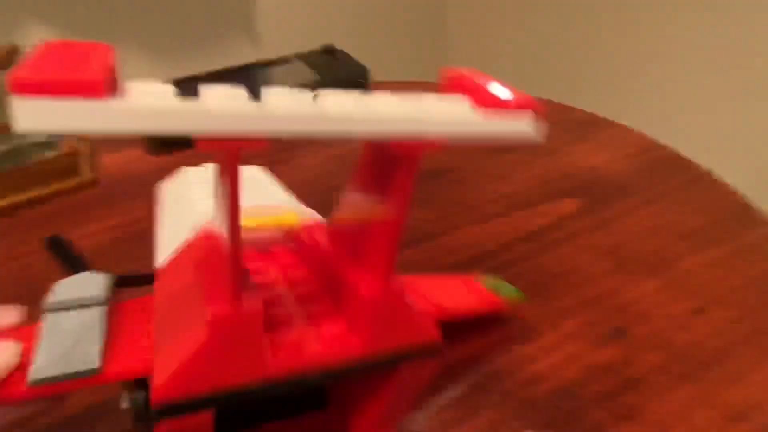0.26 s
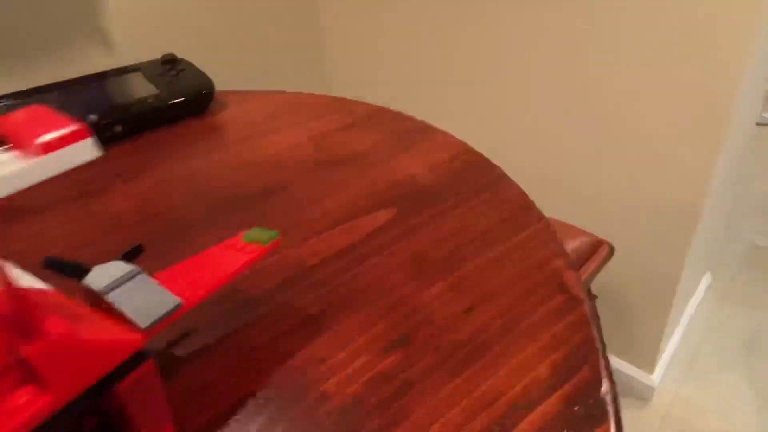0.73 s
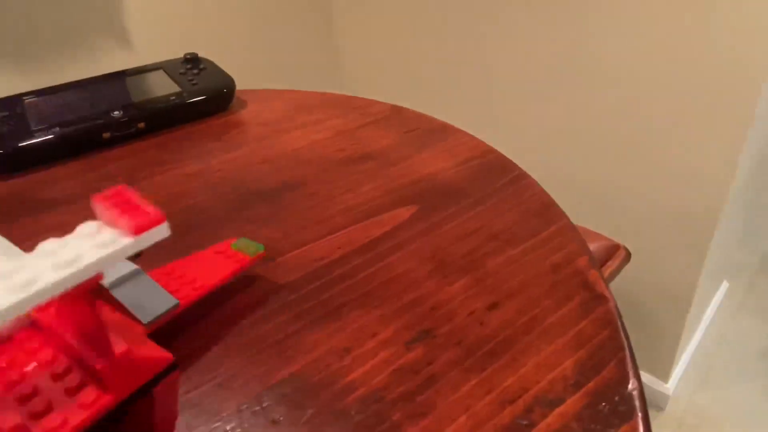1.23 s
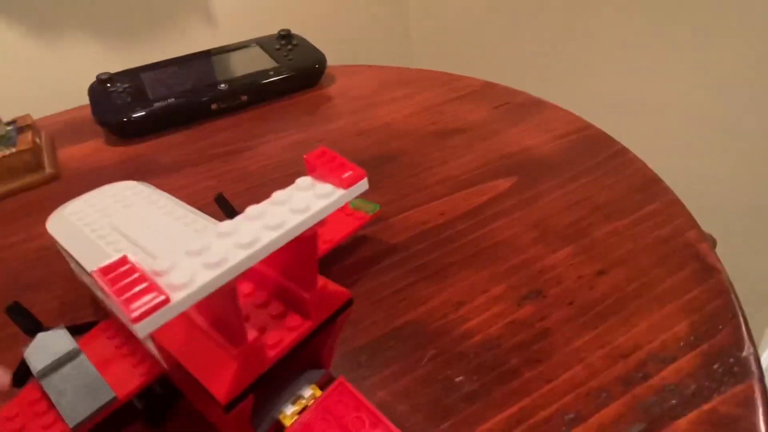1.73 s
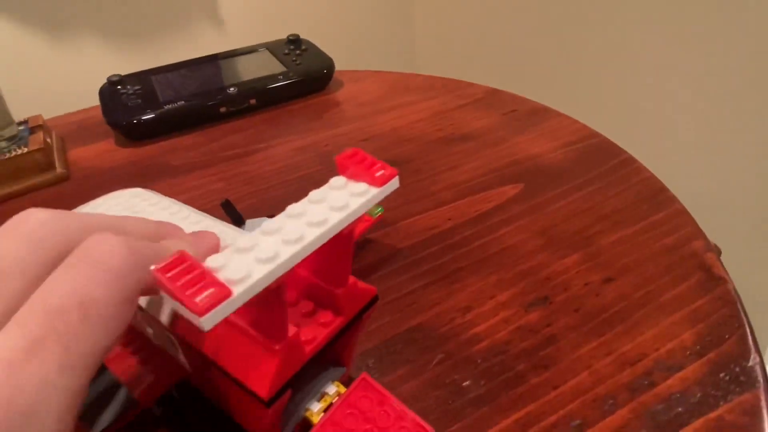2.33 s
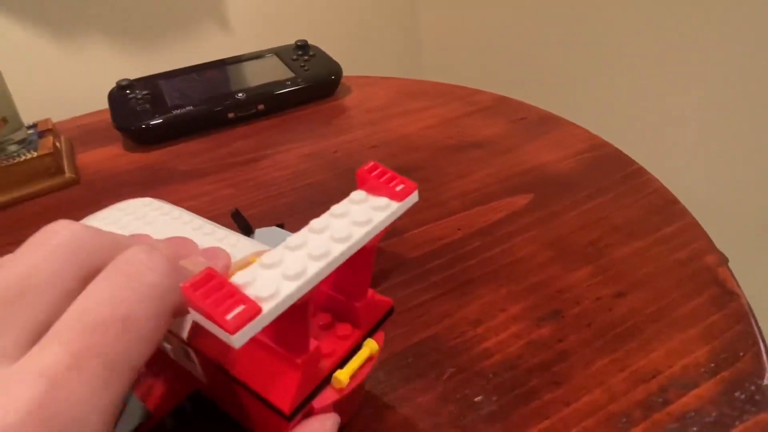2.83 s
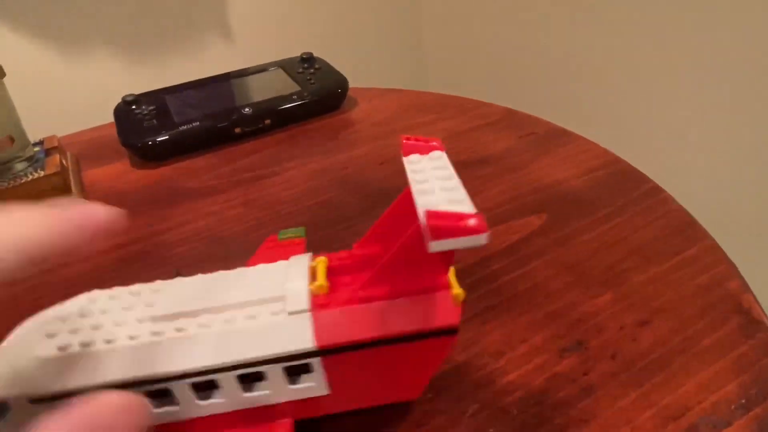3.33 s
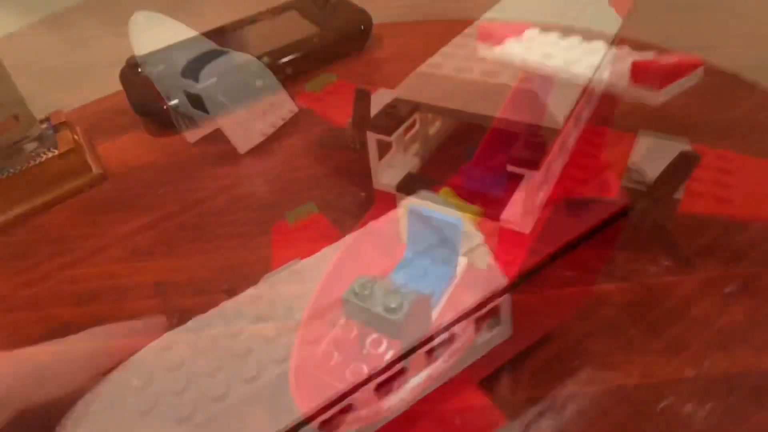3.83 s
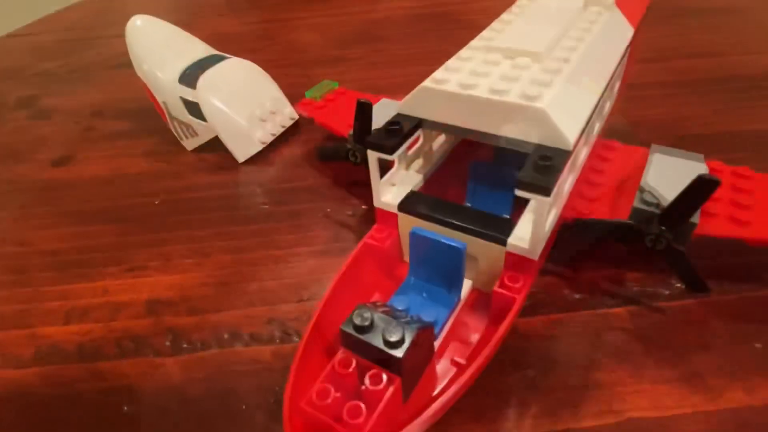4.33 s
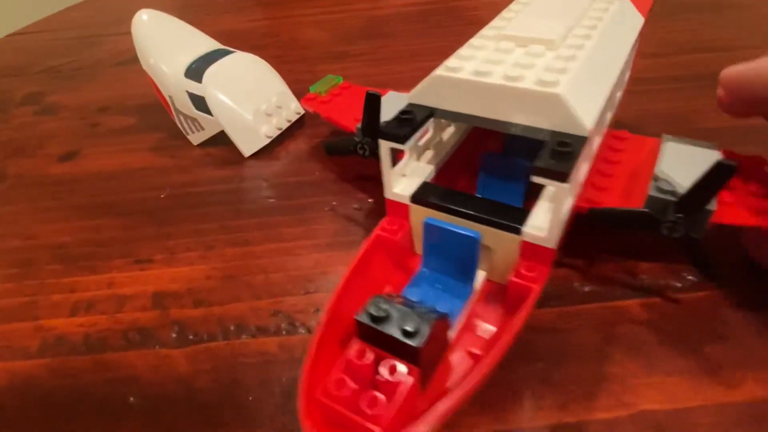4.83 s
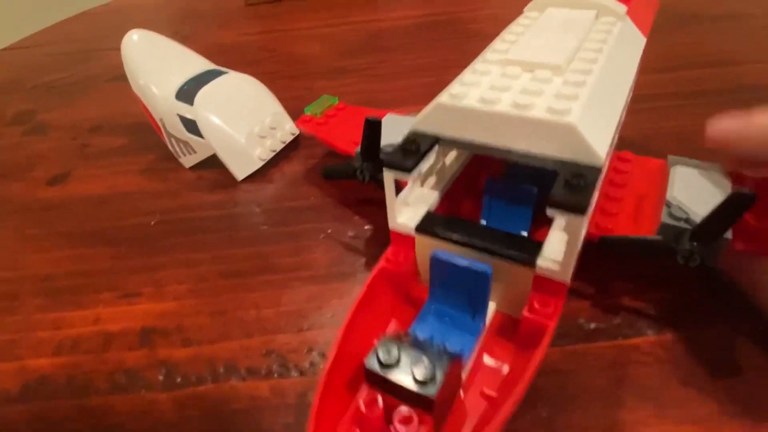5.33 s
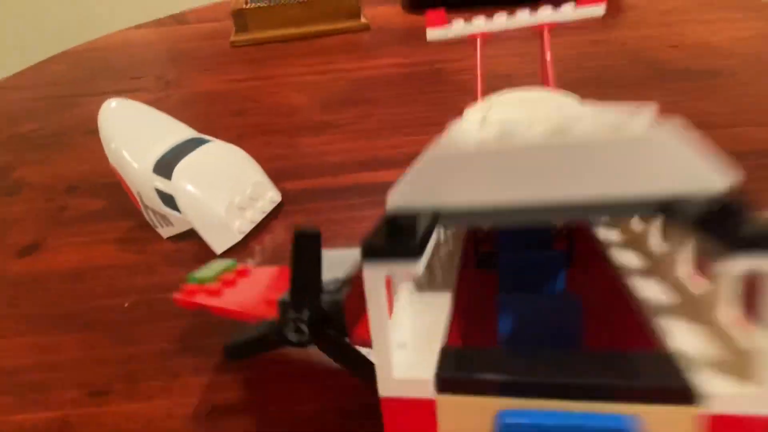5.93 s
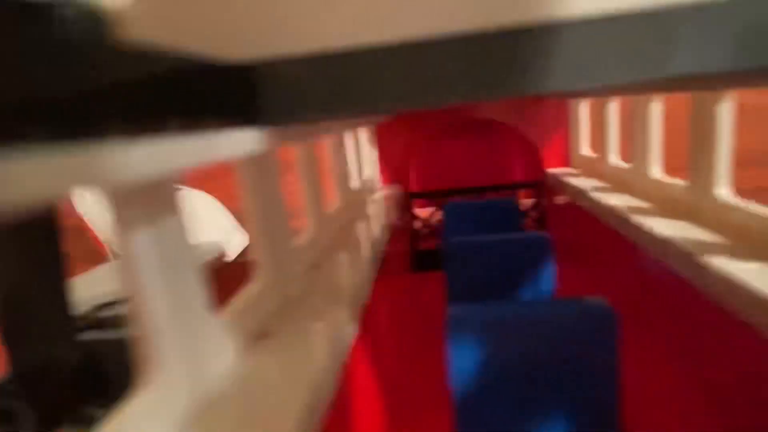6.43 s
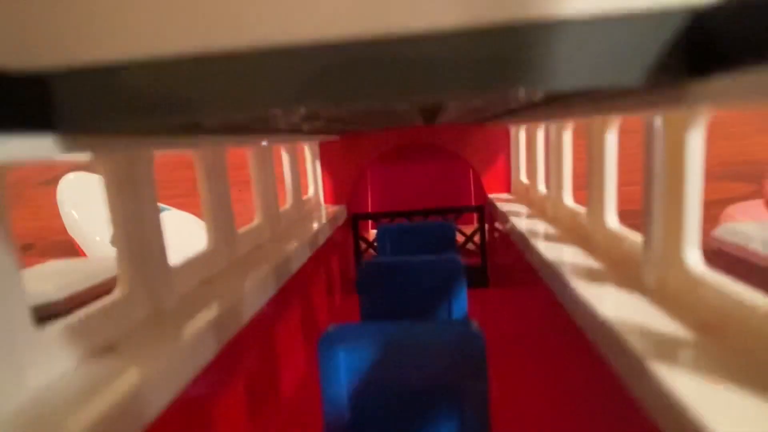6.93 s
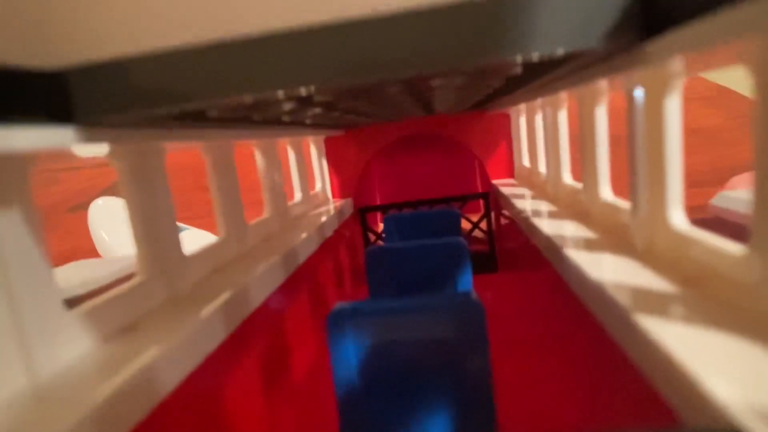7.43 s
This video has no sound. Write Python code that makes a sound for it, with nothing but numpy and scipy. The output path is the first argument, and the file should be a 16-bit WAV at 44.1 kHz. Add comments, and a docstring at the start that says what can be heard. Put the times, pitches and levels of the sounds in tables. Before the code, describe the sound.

Sharp plastic clacks and dull table thumps, soft rubbing slides and small ticks as a toy brick aeroplane is handled in a quiet room.

```python
"""Toy bricks handled on a table

A model of hollow plastic bricks is set down, turned, slid and lifted on a wooden table near two small microphones.
Tiny impacts click and rattle the thin walls, the hollow body rings briefly, and knocks make the table top thump.
Slides are streams of fine slips, one with a faint whistle; shaped noise makes the hum of a quiet room.
After a pause the model lies on the other side of the microphones.
"""
import sys
import numpy as np
from scipy import signal
from scipy.fft import rfft, irfft, next_fast_len
from scipy.io import wavfile
from scipy.ndimage import uniform_filter1d

SR = 44100
rng = np.random.default_rng(int(sys.argv[2]) if len(sys.argv) > 2 else 0)


def bounce(signal):
    """Save signal as a 16-bit WAV file at the path given by the first command-line argument."""
    frames = np.transpose(np.atleast_2d(signal))
    limited = np.clip(frames, -1, 1)
    pcm = np.round(limited * 32767).astype(np.int16)
    wavfile.write(sys.argv[1], SR, pcm)


N = 338247

# The room's noise spectrum: pitch_hz, level_db (relative)
ROOM_COLOUR = [(15, -51.5), (43, -6), (85, -8), (220, -3.5), (245, -11.5), (304, -7.5), (483, -9),
               (700, -13.5), (1090, -15.5), (2000, -29.5), (4000, -50), (7000, -51.5), (8400, -46),
               (11000, -63.5), (14000, -76), (16500, -87.5)]
# Fuzzy low hums on top of the room noise: pitch_hz, width_hz, lift_db
HUMS = [(64.6, 44, 3.5), (157, 26, 7), (201, 19, 7), (309, 55, 6), (438.2, 11, 16.5)]
# How alike the room is at left and right: pitch_hz, likeness (1 = the same)
ROOM_LIKENESS = [(60, 0.94), (240, 0.71), (950, -0.5), (3770, 0.64), (15000, 0.83)]
ROOM_DB = -53.5

# Ringing tones (modes) of the table top: pitch_hz, level_db (relative), t60_s (60 dB fall after a knock)
TABLE_MODES = [(65.4, 3.5, 0.22), (124, 0, 0.076), (138.6, 8.5, 0.11), (169.3, 1.5, 0.058),
               (210.9, 7.5, 0.088), (263.7, -1.5, 0.22), (290.9, 2, 0.17), (346, -8.5, 0.099),
               (385.3, -8, 0.099), (482, -9.5, 0.054), (602, -14, 0.04), (750, -18, 0.079)]
# The table murmuring under the moving model: time_s, level_db
RUMBLE_LEVEL = [(0, -55.5), (.32, -41), (.47, -47.5), (.56, -51.5), (1.07, -54.5), (1.28, -48), (1.64, -60),
                (2.2, -53), (2.95, -56), (3.15, -45), (3.449, -49.5), (3.89, -66), (5.48, -60),
                (5.539, -41), (5.72, -45), (6.0, -67.5), (6.41, -59.5), (7.05, -62), (7.67, -64.5)]
# Above LOAD_DB the weight favours lower table modes
RUMBLE_HZ, LOAD_DB, SINK_HZ_PER_DB = 199, -57.5, 6.5
# Knocks on the table: start_s, level_db, centre_hz (middle of the modes the blow drives)
KNOCKS = [(0.132, -18.5, 267), (0.191, -23, 286), (0.242, -20, 145), (0.278, -35, 145), (0.47, -34, 255),
          (1.067, -33, 159), (1.105, -12.5, 170), (1.142, -19.5, 202), (1.155, -20, 122),
          (1.197, -22, 283.6), (1.224, -27.5, 70.1), (2.435, -34, 137.2), (2.806, -44, 440),
          (3.428, -37.5, 139), (5.492, -21.5, 324), (5.515, -28.5, 133), (5.578, -32.5, 467),
          (5.639, -30, 126), (5.717, -36.5, 143.7), (6.042, -22.5, 382), (6.051, -26.5, 80.5),
          (6.09, -31.5, 164.5), (6.325, -36.5, 150.6), (6.335, -33, 65.2), (6.899, -23.5, 137),
          (6.923, -26.5, 148)]
# Lift of the upper table modes before and after the move: lift_db
HARD_LIFT = (6.5, 13.5)
# Left-right balance of the knocks before and after the move: left_minus_right_db
KNOCK_BALANCE = (5, -0.5)
# Random phase of each table mode, and half its left-right phase difference, in radians
THUMP_SCATTER_RAD, THUMP_SPREAD_RAD = 0.45, 0.18

# Modes of the thin brick walls: pitch_hz, width_hz, level_db (relative)
WALL_MODES = [(3590, 80, -8), (6500, 70, -4.5), (4000, 64, -9.5), (4970, 120, -3.5), (5230, 25, -14.5),
              (5800, 32, -5.5), (7100, 150, 3.5), (7480, 700, -24.5), (9000, 52, -33), (10000, 130, -6),
              (11300, 85, -9.5), (12800, 56, -16)]
# Colour of knocked brick walls: pitch_hz, level_db (relative)
WALL_COLOUR = [(880, -32.5), (1500, -4.5), (2150, -3.5), (3030, -2), (4520, -8.5), (5640, -6.5),
               (6620, -12), (7850, -15), (11500, -19), (15900, -28.5), (16500, -42.5)]
# Modes of the hollow body: pitch_hz, width_hz, level_db (relative)
BODY_MODES = [(960, 230, -3), (1278, 73, 1), (1554, 62, -0.5), (2150, 100, -7.5), (2670, 180, -5)]
# Colour of sliding bricks: pitch_hz, level_db (relative)
SLIDE_COLOUR = [(1000, -35.5), (1700, -10.5), (1910, -13.5), (2510, -10), (3150, -6.5), (3540, -4.5),
                (4120, -7), (4610, -7.5), (6080, -12), (6560, -10.5), (7570, -18), (12200, -20),
                (12600, -22.5), (13500, -55), (16500, -64.5)]
# A faint thin whistle in a slide: start_s, rise_s, hold_s, fall_s, level_db, pitch_hz, width_hz
WHISTLES = [(0.513, 0.11, 0.1, 0.06, -67, 5670, 69.4)]
# Slides and rubs: start_s, rise_s, hold_s, fall_s, hiss_db, wall_hz, body_db, body_hz
RUBS = [(0.275, 0.0028, 0.057, 0.34, -50.5, 2360, -39, 820),
        (0.201, 0.041, 0.263, 0.03, -58, 2500, -67, 1000), (0.448, 0.08, .2, 0.085, -69.5, 4480, -59, 1117),
        (0.776, 0.013, 0.043, 0.016, -61.5, 5850, -51, 1024),
        (1.03, 0.025, .05, 0.024, -50, 6420, -41, 1660), (1.295, 0.13, .01, 0.078, -69, 4470, -58, 1088),
        (1.594, 0.12, 0.16, 0.59, -68, 3117, -69, 871), (2.206, 0.031, 0.19, .06, -62, 3520, -56.5, 1226),
        (2.386, 0.036, .01, 0.1, -65.5, 4620, -60, 1132),
        (2.539, 0.043, 0.0098, 0.33, -68.5, 4500, -56.5, 1423),
        (2.864, 0.11, 0.32, 0.056, -60, 4500, -52.5, 1373), (3.0, 0.15, 0.12, 0.21, -45, 4460, -45, 1413),
        (3.279, 0.068, 0.095, 0.14, -58.5, 3510, -53.5, 1364),
        (3.525, 0.042, 0.066, 0.098, -51, 4600, -43.5, 1332),
        (3.692, 0.037, .01, 0.4, -76, 4636, -69.5, 1243),
        (4.597, 0.22, 0.048, 0.087, -73, 6600, -65.5, 1614),
        (5.084, 0.021, 0.027, 0.027, -81, 6540, -77, 1820),
        (5.173, 0.036, 0.043, .03, -81, 6690, -74.5, 2630),
        (5.37, 0.014, 0.036, 0.11, -60.5, 3960, -64, 2680),
        (5.559, 0.028, 0.097, 0.071, -64.5, 4150, -52.5, 2127),
        (5.726, 0.024, 0.036, 0.06, -76.5, 3000, -59.5, 2090)]
# Loose bricks rattling after a knock: start_s, fall_s, hiss_db, body_db, body_hz
LOOSE_RATTLES = [(0.136, 0.1, -31.5, -31, 1290), (0.188, 0.1, -33.5, -38.5, 994),
                 (1.106, 0.26, -27.5, -38, 1680), (1.221, 0.056, -43, -26, 1644),
                 (2.812, 0.037, -70, -66, 1650), (5.491, 0.16, -29.5, -35, 2048),
                 (5.593, 0.029, -32, -35.5, 2820), (6.045, 0.12, -35.5, -33, 2450),
                 (6.33, 0.057, -72, -42.5, 1930), (6.48, 0.066, -64.5, -60.5, 2008),
                 (6.619, .05, -68.5, -71.5, 1226), (6.887, 0.1, -38.5, -33, 2040)]
# Clicks: start_s, crack_db, wall_hz, treble_lift_db (negative dulls), ring_db, ring_hz
BRICK_CLICKS = [(0.133, -8.5, 2290, 12, -15.5, 910), (0.1889, -18.5, 11240, 6, -15.5, 1040),
                (0.2178, -21.5, 4700, 2, -26, 1420), (0.2397, -24.5, 6500, 3.5, -8, 966),
                (0.277, -47, 2400, 21, -18, 900), (0.604, -42, 9900, 47, -63, 918),
                (0.813, -27, 4480, -5, -30, 916), (0.8216, -32, 4290, -12, -37, 990),
                (0.962, -57.5, 4900, -4.5, -64, 1200), (0.9153, -94, 2820, 0.5, -37, 1310),
                (1.057, -38, 6400, -1, -33, 1680), (1.1038, -2.5, 4310, 7, -12.5, 960),
                (1.106, -7, 7080, -6, -13, 1930), (1.1419, -11, 7200, 2.5, -17, 4240),
                (1.154, -22, 3990, 8.5, -12, 1130), (1.1641, -15, 4440, 3, -19.5, 1150),
                (1.1755, -23, 4600, 2.5, -29, 1900), (1.196, -21, 6500, 10, -26.5, 1050),
                (1.2084, -22.5, 4660, 8, -23.5, 1110), (1.2202, -26.5, 10510, 7, -23, 2500),
                (1.2217, -19.5, 2600, -5, -15, 1527), (1.233, -31, 2300, -10, -24, 1727),
                (1.344, -43, 4270, 19, -36, 1210), (1.3847, -37, 5000, 3, -36.5, 970),
                (1.4165, -34.5, 2758, 6.5, -42, 1190), (2.223, -59.5, 3535, -5, -37, 1423),
                (2.2994, -36.5, 2760, 3, -28, 1254), (2.3569, -46, 3370, 7, -49, 964),
                (2.4131, -37.5, 5500, 13, -33, 1040), (2.4189, -47, 6700, 17, -32, 1030),
                (2.43, -40, 4220, -1, -31.5, 1757), (2.577, -31.5, 5060, 13, -59, 1613),
                (2.804, -21, 4150, -1, -23, 1233), (2.8068, -18.5, 3245, -9.5, -21.5, 1682),
                (3.032, -39.5, 4280, 19.5, -43.5, 915), (3.355, -37, 3620, -11, -60, 1400),
                (3.1016, -44, 4200, 17, -33, 1530), (3.2535, -30, 4460, -16, -35, 1430),
                (3.272, -29, 4120, 10.5, -53, 1220), (3.5807, -32.5, 3830, -5, -49.5, 1300),
                (3.5998, -28, 4890, 11, -49, 1415), (3.778, -58.5, 4440, -5.5, -39, 1452),
                (3.807, -60.5, 2900, -1, -44.5, 1310), (3.833, -46, 2726, 4, -63, 1287),
                (3.9443, -55, 4590, 12, -60.5, 1193), (3.962, -57.5, 4500, 8.5, -64.5, 1204),
                (4.2296, -55, 8460, 23, -81, 693), (4.8074, -43.5, 6500, 6, -55.5, 1096),
                (5.216, -58, 4110, 16, -69.5, 2610), (5.3792, -45.5, 6430, -4, -70, 693),
                (5.388, -42.5, 8770, 11, -36, 2730), (5.414, -39.5, 6550, 2, -45, 3960),
                (5.492, -29, 6560, 18, -27.5, 2400), (5.5131, -13.5, 6620, 12, -22, 2400),
                (5.577, -52, 4320, -2, -45, 2070), (5.5918, -33, 6300, 17, -24, 3180),
                (5.6308, -40, 3940, 0, -44, 2000), (5.638, -42, 6600, 2, -42, 2190),
                (5.7153, -55, 6500, -14, -39, 2570), (5.74, -54.5, 6900, -0.5, -60.5, 2000),
                (5.773, -58.5, 4770, -10, -47, 2200), (5.823, -66.5, 6500, 0.5, -50.5, 2100),
                (6.0414, -23, 4170, 28, -29.5, 2480), (6.086, -33, 4170, 1, -26.5, 2310),
                (6.3256, -56, 3670, -1.5, -39, 2130), (6.34, -45.5, 2790, -33, -45.5, 1484),
                (6.48, -47.5, 6930, 16.5, -59, 2115), (6.5042, -47.5, 7250, 13.5, -54, 2020),
                (6.6387, -55.5, 6700, 19, -58, 1475), (6.8918, -30, 6280, 21.5, -35.5, 2223),
                (6.9017, -23, 2620, 15, -38, 2140), (6.9299, -27, 7360, 20, -29, 2135),
                (6.947, -49, 6940, -8, -62, 2060)]
ENDS_DB, SLIDE_CURVE = -37.5, 1.47  # level where a rise starts or a fall ends; power of the swell
RATTLE_RISE_S, RATTLE_CURVE, RATTLE_WALL_HZ = 0.002, 0.81, 4360
SLIDE_ROUGH, RATTLE_ROUGH = 0.8, 1.05  # how uneven the slips are
RING_WIDTH = 0.1  # width of the hollow ring as a share of its pitch

MOVED_S = 4.4  # the model is on the other side from here on
# Two lists, before and after the move: pitch_hz, left_lead_rad
LEFT_LEAD = ([(0, 0), (1890, 2.8), (2670, 1.9), (7060, 13.1), (8700, 22.4), (9820, 19.9), (14400, 14.9),
              (15200, 12.6), (16400, 13.0)], [(0, 0), (3010, -8.8), (4310, -6.4), (7410, -15.6),
              (9300, -12.3), (9820, -13.1), (16400, -12.3)])
# Two lists, before and after the move: pitch_hz, left_minus_right_db
PORT_BALANCE = ([(60, 0), (150, 0), (380, -3.5), (950, 7.5), (2380, -6), (5980, 0.5), (15000, -3.5)],
                 [(60, -8), (150, -4.5), (380, -5), (950, -9), (2380, 4), (5980, -5), (15000, -1)])
# Balance of the brick sounds as the place changes: time_s, left_minus_right_db
PLACE_BALANCE = [(0, 1), (4.4, -0.5), (5.5, -1), (6.1, -8.5), (6.9, -9)]
# Share of the left-right wander and balance in each band: pitch_hz, share
STEREO_SHARE = [(300, 0.23), (2000, 0.91), (8500, 1), (10500, 0.049)]
SPREAD_RAD = 0.82  # typical phase wander at each port where the share is 1
EDGE_HZ = 16500  # upper band limit


def amp(db):
    """Turn decibels into a gain."""
    return 10 ** (np.asarray(db) / 20)


def evened(x):
    """Scale to an average (RMS) level of 1."""
    return x / np.sqrt(np.mean(x ** 2) + 1e-20)


def peaked(x):
    """Scale to a tallest peak of 1."""
    return x / (abs(x).max() + 1e-20)


def read(points, hz):
    """Read a curve between its points, on a logarithmic pitch scale."""
    f, value = np.transpose(points)
    return np.interp(np.log(hz + 1), np.log(f + 1), value)


def add(mix, s, sound):
    """Add a sound to the mix at s seconds, cutting what runs past the end."""
    part = mix[:, round(s * SR):][:, :sound.shape[1]]
    part += sound[:, :part.shape[1]]


def patchwork(shape, bins, frames):
    """Smooth random patches over pitch and time."""
    smooth = uniform_filter1d(rng.standard_normal(shape), bins, 0)
    return evened(uniform_filter1d(smooth, frames, 1))


def resonate(x, hz, width):
    """One complex pole: a resonance of gain 1 that rings longer when narrower."""
    r = np.exp(-np.pi * abs(width) / SR)
    return 2 * signal.lfilter([1 - r], [1, -r * np.exp(2j * np.pi * hz / SR)], x + 1e-18).real


def through(modes, x, spread_db):
    """Sum of the modes; each point of contact drives them in other shares."""
    shares = amp(spread_db * rng.standard_normal(len(modes))) * rng.choice([-1, 1], len(modes))
    return sum(g * amp(db) * resonate(x, hz, width) for g, (hz, width, db) in zip(shares, modes))


def causal(points):
    """Filter taps for a spectrum, with the energy as early as possible (minimum phase)."""
    log_gain = np.log(amp(read(points, abs(np.fft.fftfreq(4096, 1 / SR)))))
    return np.fft.ifft(np.exp(np.conj(signal.hilbert(log_gain)))).real[:512]


def swell(longest_s, rise_s, hold_s, fall_s, curve):
    """Level in dB that climbs to zero, holds and sinks again."""
    t = np.arange(round(longest_s * SR)) / SR - rise_s
    before = np.maximum(-t, 0) / max(rise_s, .001)
    after = np.maximum(t - hold_s, 0) / max(fall_s, .001)
    return np.maximum(ENDS_DB * (before + after) ** curve, -100)


def room():
    """Dull steady noise with a few fuzzy low hums, partly alike at left and right."""
    frames, hz = N // 512 + 5, np.fft.rfftfreq(2048, 1 / SR)
    a, b, c, d = rng.standard_normal((4, 1025, frames))
    same = np.clip(read(ROOM_LIKENESS, hz), -1, 1)[:, None]
    left = a + 1j * b
    right = same * left + np.sqrt(1 - same ** 2) * (c + 1j * d)
    hums = 1 + sum(amp(db) / (1 + (2 * (hz - f) / width) ** 2) for f, width, db in HUMS)
    colour_db = read(ROOM_COLOUR, hz)[:, None] + 1.9 * patchwork(a.shape, 8, 6)
    z = np.array([left, right]) * hums[:, None] * amp(colour_db)
    noise = signal.istft(z, nperseg=2048, noverlap=1536)[1][:, :N]
    return amp(ROOM_DB) * evened(noise)


def echoes(x):
    """Room reflections: sparse taps of random sign; the treble dies first."""
    taps = np.zeros((2, SR // 2))
    at = np.arange(60, SR // 2 - 20, 20)
    at = at + rng.integers(0, 20, (2, len(at)))
    np.put_along_axis(taps, at, rng.choice([-1., 1.], at.shape), 1)
    hz, t, z = signal.stft(taps, SR, nperseg=256)
    t60 = read([(150, 0.28), (1500, 0.16), (10000, 0.058)], hz)[:, None]  # seconds at each pitch
    tail = signal.istft(z * amp(-60 * t / t60), SR, nperseg=256)[1]
    return signal.fftconvolve(x, tail / np.linalg.norm(tail[0]), axes=1)[:, :N]


def rumble():
    """Dragging keeps the table modes near a centre murmuring, not quite alike at the two ports."""
    level_db = np.interp(np.arange(N) / SR, *np.transpose(RUMBLE_LEVEL))
    load_db = np.maximum(level_db - LOAD_DB, 0)
    centre_hz = np.maximum(RUMBLE_HZ - SINK_HZ_PER_DB * load_db, 100)
    pushes = rng.standard_normal(N) + 0.6 * rng.standard_normal((2, N))  # shared push + one for each port
    out, power = np.zeros((2, N)), 0
    for hz, db, t60 in TABLE_MODES:
        share = amp(db - 22.0 * abs(np.log2(hz / centre_hz)))
        out += share * evened(np.array([resonate(push, hz, 0.52 / t60) for push in pushes]))
        power += share ** 2
    return amp(level_db) * out / np.sqrt(power)


def thump(level_db, centre_hz, hard_db, side_db):
    """A knock with a rise of a few ms rings the table modes near its centre most."""
    t = np.arange(round(.4 * SR)) / SR
    hz, db, t60 = np.transpose(TABLE_MODES)[..., None]
    db = db - 7.7 * abs(np.log2(hz / centre_hz)) + hard_db * (hz > 330)  # a hard blow wakes the upper modes
    start, lead = rng.standard_normal((2, 1, *hz.shape))
    half = np.reshape([1, -1], (2, 1, 1))  # left, right
    # nearly equal phases make the blow one push; the two ports are a little out of step
    phase = THUMP_SCATTER_RAD * start + THUMP_SPREAD_RAD * half * lead
    modes = amp(db - 60 * t / t60) * np.sin(2 * np.pi * hz * t + phase)
    knock = peaked(modes.sum(1) * (1 - np.exp(-t / 0.0027)))
    return amp(level_db + side_db / 2 * half[:, 0]) * knock


def whistle(rise_s, hold_s, fall_s, db, hz, width):
    """A narrow band of noise swells and fades."""
    level_db = swell(.8, rise_s, hold_s, fall_s, SLIDE_CURVE)
    tone = evened(resonate(rng.standard_normal(len(level_db)), hz, width))
    return (amp(db + level_db) * tone)[None]


def shifting(x, patchy_db, size):
    """The points of contact wander: patches of the spectrum swell and fade."""
    z = signal.stft(x, nperseg=256, noverlap=192)[2]
    z = z * amp(patchy_db * patchwork(z.shape, 3, size))
    return signal.istft(z, nperseg=256, noverlap=192)[1][:len(x)]


def stroke(level_db, hiss_db, wall_hz, body_db, body_hz, colour, rough, size):
    """Dense fine slips drive the thin walls (hiss) and the hollow body."""
    t = np.arange(len(level_db)) / SR
    grip_db = rough * 2.6 * evened(uniform_filter1d(rng.standard_normal(len(t)), 200))
    bursts_db = rough * 3.0 * rng.exponential(1, (2, len(t))).clip(0, 5)
    slips = rng.standard_normal((2, len(t))) * amp(grip_db + bursts_db)
    hiss = signal.oaconvolve(slips[0], causal(colour))[:len(t)]
    hiss = hiss + amp(-6.5) * sum(amp(db) * resonate(hiss, hz, width) for hz, width, db in WALL_MODES)
    hiss = evened(hiss) + amp(-5.5) * evened(resonate(slips[0], wall_hz, 410))
    width = 300 * (body_hz / 1400) ** 2  # small cavities sound higher and ring less
    body = evened(resonate(resonate(slips[1], body_hz, width), body_hz, 2 * width))
    body = body + amp(-2.0) * evened(through(BODY_MODES, resonate(slips[1], body_hz, 900), 0))
    sound = amp(hiss_db) * evened(shifting(hiss, 2.3, size))
    sound = sound + amp(body_db) * evened(shifting(body, 2.3 - 1.5, size))
    return (sound * amp(level_db) * signal.windows.tukey(len(t), .02))[None]


def slide(rise_s, hold_s, fall_s, *contact):
    """Bricks rub along: a stroke that swells, holds and sinks."""
    level_db = swell(.8, rise_s, hold_s, fall_s, SLIDE_CURVE)
    return stroke(level_db, *contact, SLIDE_COLOUR, SLIDE_ROUGH, size=50)


def rattle(fall_s, hiss_db, *body):
    """Loose bricks shake after a knock: a rougher stroke that starts fast and dies away."""
    level_db = swell(.3, RATTLE_RISE_S, 0, fall_s, RATTLE_CURVE)
    return stroke(level_db, hiss_db, RATTLE_WALL_HZ, *body, WALL_COLOUR, RATTLE_ROUGH, size=12)


def click(crack_db, wall_hz, sharp_db, ring_db, ring_hz):
    """A few ms of tiny impacts crack the thin walls and ring the hollow body."""
    t = np.arange(round(.15 * SR)) / SR
    grains = rng.standard_normal((2, len(t))) * amp(1.5 * rng.exponential(1, (2, len(t))).clip(0, 4))
    # row 0 drives the walls, row 1 the body; a weak tail follows
    contact = np.exp(-((t - [[0], [.002]]) / [[.004], [.0016]]) ** 2) + amp(-26) * np.exp(-t / .012)
    chatter = grains * (1 - np.exp(-t / .0013)) * contact
    walls = signal.oaconvolve(chatter[0], causal(WALL_COLOUR))[:len(t)]
    walls = walls + amp(2.0) * through(WALL_MODES, walls, 1.5)
    # a sharp contact lifts the treble
    walls = signal.oaconvolve(walls, causal([(6000, 0.0047), (9000, sharp_db)]))[:len(t)]
    crack = peaked(walls) + amp(1.5) * peaked(resonate(chatter[0], wall_hz, 320))
    ring = peaked(resonate(chatter[1], ring_hz, RING_WIDTH * ring_hz))
    push = resonate(resonate(chatter[1], ring_hz, 1500), ring_hz, 1500)
    body_share = amp(-4.0) * min(1, (2200 / ring_hz) ** 3)  # high rings carry less of the body modes
    ring = ring + body_share * peaked(through(BODY_MODES, push, 1.4))
    return (amp(crack_db) * peaked(crack) + amp(ring_db) * ring)[None]


def placed(x):
    """Contacts lie all over the model: their left-right lag wanders, their balance follows its place."""
    hz, t, z = signal.stft(x, SR, nperseg=256, noverlap=192)
    share = read(STEREO_SHARE, hz)[:, None]
    balance_db = share * np.interp(t, *np.transpose(PLACE_BALANCE))
    half = amp(balance_db / 2) * np.exp(1j * SPREAD_RAD * share * patchwork(z.shape, 5, 12))
    return signal.istft([z * half, z / half], nperseg=256, noverlap=192)[1][:, :N]


def ports(x):
    """The two microphone ports hear each place of the model with their own lag and balance."""
    size = next_fast_len(N + 4096)
    hz, before = np.fft.rfftfreq(size, 1 / SR), np.arange(N) < MOVED_S * SR
    out = np.zeros((2, N))
    for part, lead, sides in zip((before, ~before), LEFT_LEAD, PORT_BALANCE):
        half = amp(read(sides, hz) / 2) * np.exp(.5j * np.interp(hz, *np.transpose(lead)))
        out += irfft(rfft(x * part, size) * [half, 1 / half], size)[:, :N]
    return out


def scene():
    """Put the table and brick sounds in time and place, then add echoes and the room."""
    bricks, table = np.zeros((1, N)), rumble()  # bricks in one channel, table in two
    for s, *blow in KNOCKS:
        place = int(s > MOVED_S)
        add(table, s, thump(*blow, HARD_LIFT[place], KNOCK_BALANCE[place]))
    for events, source in ((WHISTLES, whistle), (RUBS, slide), (LOOSE_RATTLES, rattle), (BRICK_CLICKS, click)):
        for s, *settings in events:
            add(bricks, s, source(*settings))
    model = placed(bricks[0]) + table
    return ports(model) + amp(-10) * echoes(model) + room()


def record(dry):
    """Small microphones lose deep bass; the top treble falls away above about 12.5 kHz; the input rounds off
    tall peaks; then the band limit."""
    thin = signal.sosfilt(signal.butter(2, 45, "high", fs=SR, output="sos"), dry)
    dull = signal.oaconvolve(thin, causal([(12400, -0.5), (13300, -7.5)])[None])[:, :N]
    rounded = 1.2 * np.tanh(dull / 1.2)
    band_limit = signal.firwin(511, EDGE_HZ, window=("kaiser", 9), fs=SR)
    return signal.oaconvolve(rounded, band_limit[None], "same")


dry = scene()
out = record(dry)
bounce(out)
```